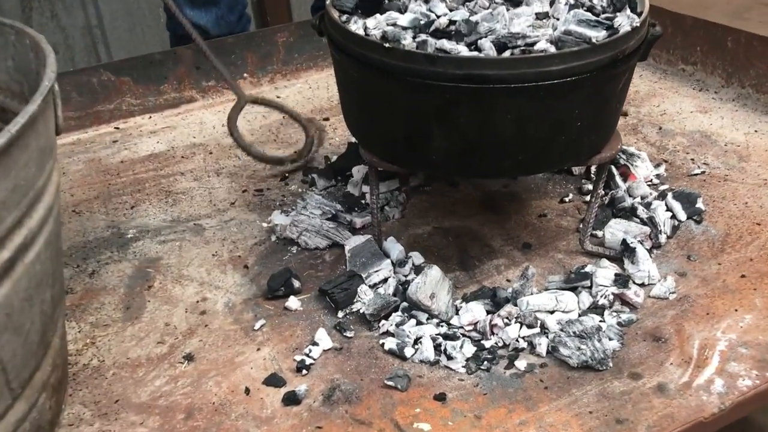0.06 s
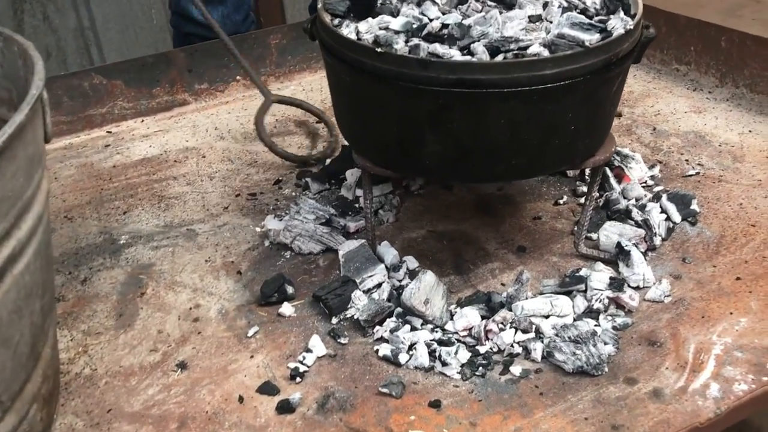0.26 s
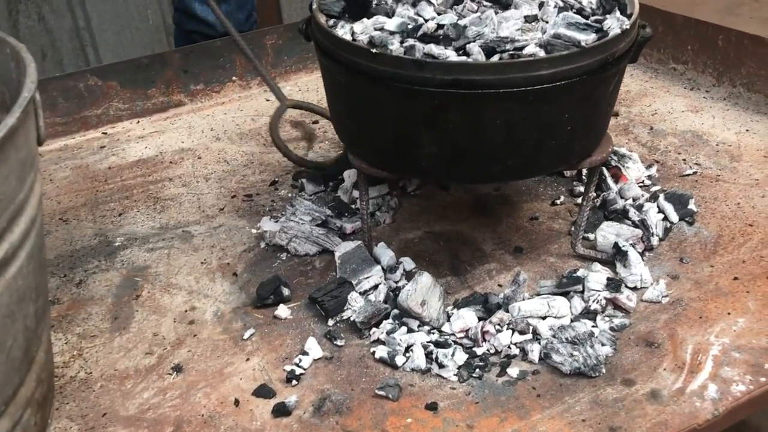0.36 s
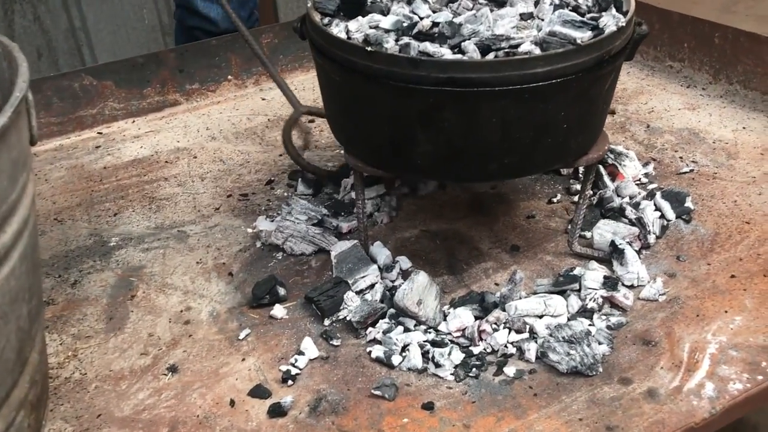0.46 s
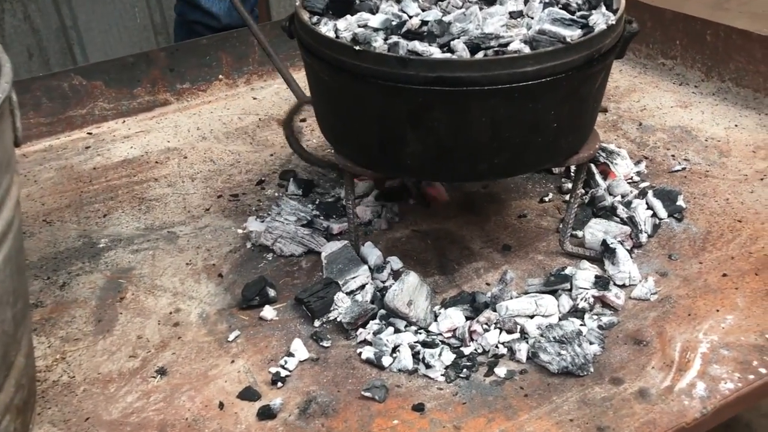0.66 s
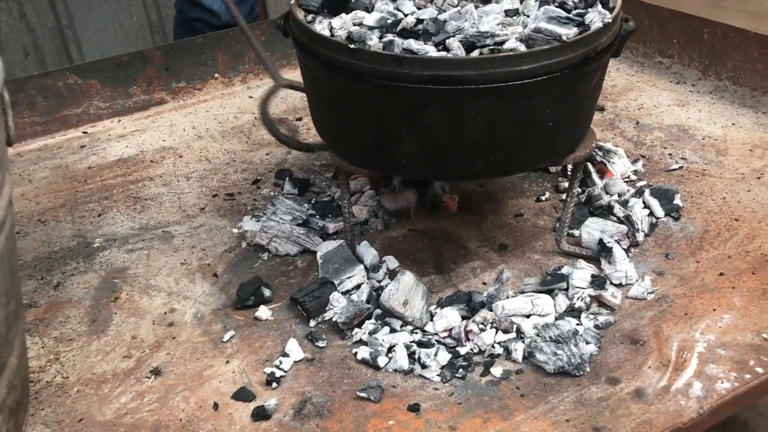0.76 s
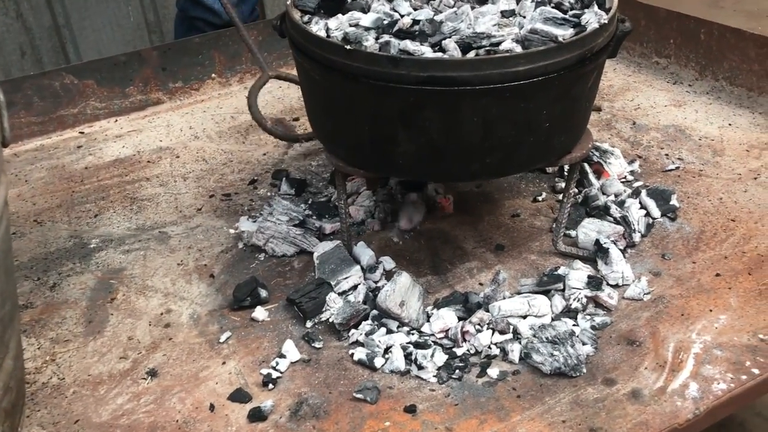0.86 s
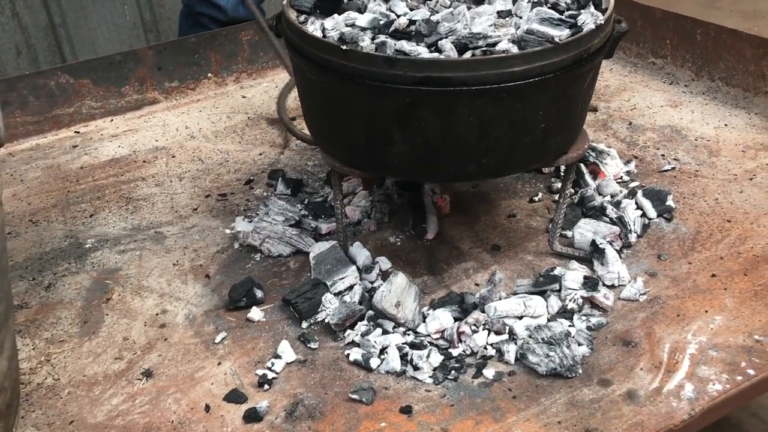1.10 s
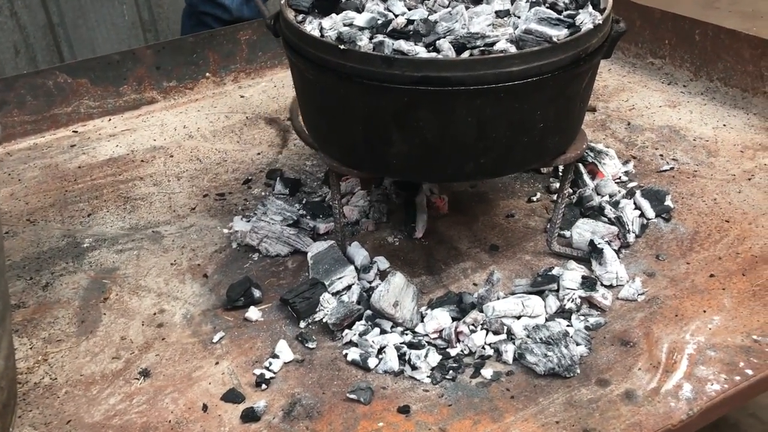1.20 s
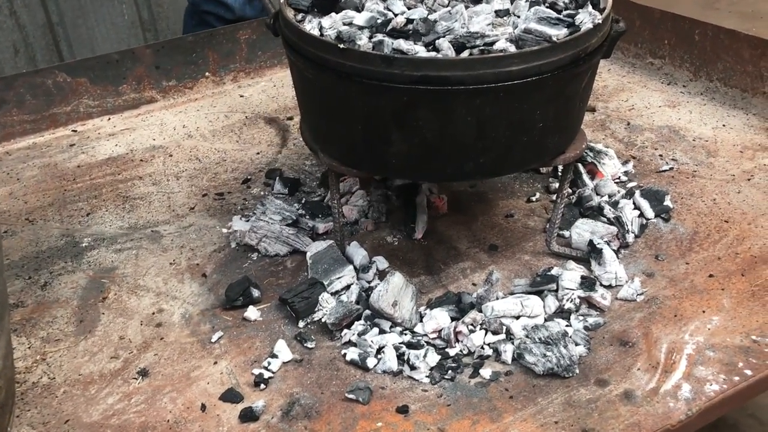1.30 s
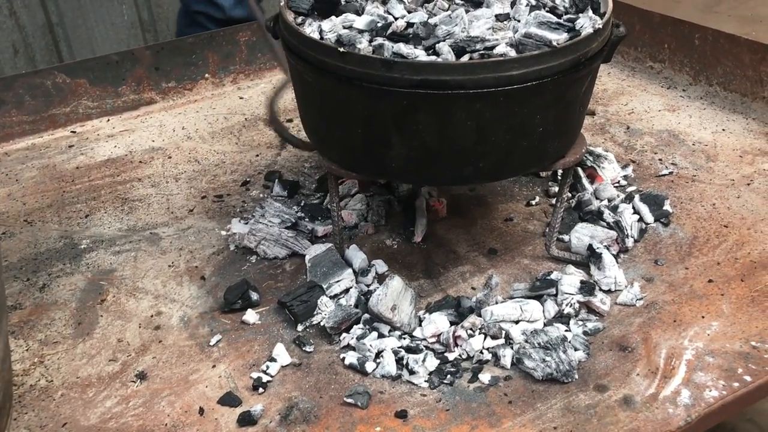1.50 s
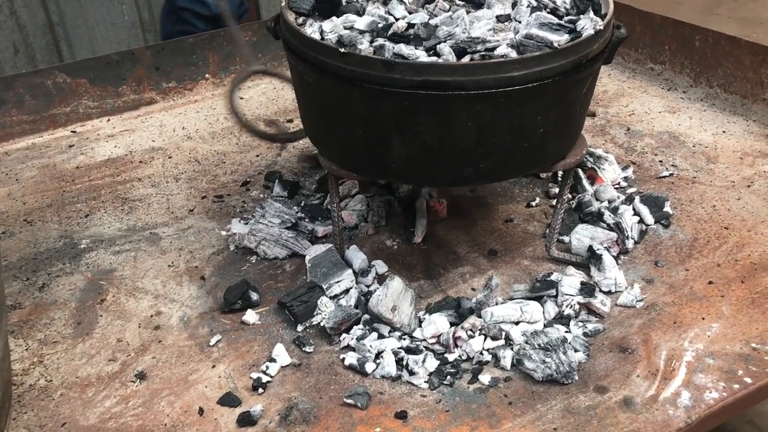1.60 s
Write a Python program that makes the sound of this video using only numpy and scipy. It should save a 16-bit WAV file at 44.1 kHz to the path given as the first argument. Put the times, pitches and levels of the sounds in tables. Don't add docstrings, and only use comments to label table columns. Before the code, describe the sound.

A metal poker shoves hard coals across a sheet-metal table: a sharp clanky knock and rattling scrape, a brief lull, then duller low thuds under an iron pot, close stereo microphones in a reverberant barn.

```python
import sys
import numpy as np
from scipy import signal
from scipy.fft import rfft, irfft
from scipy.io import wavfile
from scipy.ndimage import uniform_filter1d

SR = 44100
rng = np.random.default_rng(int(sys.argv[2]) if len(sys.argv) > 2 else 0)


def ratio_of_db(decibels):
    return 10 ** (np.asarray(decibels, float) / 20)


def put_to_file(sound):
    columns = np.atleast_2d(sound).T
    safe = np.clip(columns, -1, 1)
    whole_steps = np.round(safe * 32767)
    wavfile.write(sys.argv[1], SR, whole_steps.astype(np.int16))


N = 72765
LEAD = SR // 4
LONG = N + LEAD
RISE = 0.31

# (start [s], length [s], force [dB], contact hardness [Hz], grit [dB])
RIM_CONTACTS = [(-.12, 0.12, -51.5, 1630, -56.5), (-.02, 0.061, -50.5, 2950, -57.5),
                (0.2298, 0.00334, -26.5, 2390, -38.5), (0.243, 0.02, -27.5, 2220, -81),
                (0.352, 0.037, -44, 900, -42), (0.373, 0.059, -26.5, 2420, -45),
                (0.449, 0.02, -29.5, 2560, -39.5), (0.478, 0.044, -30, 3660, -42.5),
                (0.547, 0.097, -47, 2460, -56), (0.708, 0.034, -50, 870, -61),
                (0.763, 0.0058, -37, 634, -48.5), (0.8576, 0.0053, -39, 1250, -48),
                (0.876, 0.033, -45.5, 990, -61), (0.918, 0.03, -47, 1260, -66)]
# (start [s], length [s], force [dB], contact hardness [Hz], grit [dB])
MIDDLE_CONTACTS = [(1.069, 0.011, -32, 402, -47.5), (1.078, 0.027, -31.5, 730, -57.5),
                   (1.098, 0.011, -49, 350, -72), (1.121, 0.0064, -29, 415, -71),
                   (1.142, 0.0084, -32.5, 454, -51), (1.18, 0.041, -36, 1180, -52),
                   (1.225, 0.029, -45.5, 3380, -46.5), (1.247, 0.077, -33, 870, -45),
                   (1.324, 0.019, -41.5, 2030, -47), (1.365, 0.073, -43, 1210, -60.5),
                   (1.43, 0.036, -58.5, 4000, -64), (1.487, 0.032, -45.5, 820, -75),
                   (1.572, 0.036, -49.5, 790, -64)]


def read(points, hz):
    f, value = np.transpose(points)
    return np.interp(np.log(hz + 1), np.log(f + 1), value)


def evened(x):
    return x / np.sqrt(np.mean(x ** 2) + 1e-20)


def colour(x, points):
    count = x.shape[-1]
    gain = ratio_of_db(read(points, np.fft.rfftfreq(count, 1 / SR)))
    return irfft(rfft(x) * gain, count)


def two_sides(a, b, same):
    same = np.clip(same, 0, 1)
    return np.array([a, same * a + np.sqrt(1 - same ** 2) * b])


def pair(count):
    # (frequency [Hz], left-right likeness [0 to 1])
    likeness = [(100, 0.97), (700, 1), (1500, 0.74), (3000, 0.36), (6000, 0.061), (14000, 0.074)]
    a, b = rfft(rng.standard_normal((2, count)))
    same = read(likeness, np.fft.rfftfreq(count, 1 / SR))
    return irfft(two_sides(a, b, same), count)


def dying(t60s, rise_s, count=SR):
    hz, t, z = signal.stft(pair(count), SR, nperseg=256)
    fade = ratio_of_db(-60 * t / read(t60s, hz)[:, None])
    tail = signal.istft(z * fade, SR, nperseg=256)[1][:, :count]
    tail = tail * np.minimum(np.arange(count) / SR / rise_s, 1)
    return tail / np.linalg.norm(tail[0])


def through(x, response):
    return signal.fftconvolve(np.atleast_2d(x), np.atleast_2d(response), axes=1)[:, :LONG]


def clicks(per_s, spread_db):
    size = ratio_of_db(spread_db * np.minimum(rng.exponential(1, LONG), 4))
    size = size * rng.choice([-1, 1], LONG)
    return evened(size * (rng.random(LONG) < per_s / SR))


def pressure(start, length, release_s):
    t = (np.arange(LONG) - LEAD) / SR - start
    rise = np.clip(t / (RISE * length), 0, 1)
    return rise * np.exp(-np.maximum(t - length, 0) / release_s)


def still_air():
    # (frequency [Hz], level per Hz [dB])
    air_colour = [(20, -20), (55, 7), (90, 2), (150, 3), (400, -4), (1200, -15.5), (4000, -29),
                  (11000, -31), (15800, -46)]
    return ratio_of_db(-48) * evened(colour(pair(LONG), air_colour))


def table(contacts, spot):
    # (pitch [Hz], t60 [s], level struck at rim [dB], level struck in middle [dB])
    plate_modes = [(138.2, 0.36, -13.5, -10), (206.5, 0.3, -12, -7.5), (248.3, 0.19, -8.5, -8.5),
                   (343, 0.19, -14.5, -12), (386.4, 0.55, -10.5, -16), (471.5, 0.46, -15, -11),
                   (625, 0.14, -17.5, -15), (778, 0.34, -12, -15.5), (790.3, 0.077, -14.5, -4),
                   (841, 0.24, -9, -3), (904, 0.14, -18, -6), (1050, 0.32, -17, -44),
                   (1530, 0.12, -24, -33), (2136, 0.2, -31, -32)]
    # (frequency [Hz], level [dB])
    rumble_colour = [(40, -53), (110, -2.5), (300, 0.5), (900, -1.5), (1200, -1.5), (2200, 0), (3200, -8.5),
                     (8000, -15)]
    # (frequency [Hz], t60 [s])
    rumble_t60 = [(100, 0.9), (800, 0.43), (3000, 0.29)]
    out = np.zeros((2, LONG + SR))
    bumps = clicks(per_s=500, spread_db=5)
    t = np.arange(SR // 2) / SR
    modes = 0
    for mode in plate_modes:
        modes = modes + ratio_of_db(mode[2 + spot] - 60 * t / mode[1]) * np.sin(2 * np.pi * mode[0] * t) / 18
    for start, length, force_db, hard_hz, _ in contacts:
        at = LEAD + round(start * SR)
        push = (bumps * pressure(start, length, release_s=0.007))[at:at + SR // 5]
        push[0] += 12
        pole = np.exp(-2 * np.pi * hard_hz / SR)
        force = ratio_of_db(force_db) * signal.lfilter([(1 - pole) ** 2], [1, -2 * pole, pole ** 2], push)
        rumble = colour(dying(rumble_t60, 0.00073, count=SR // 2), rumble_colour) * (t < .4)
        ring = through(force, modes + ratio_of_db(14) * rumble)
        out[:, at:at + ring.shape[1]] += ring
    bass_cut = signal.butter(3, 99, "high", fs=SR, output="sos")
    return signal.sosfilt(bass_cut, out[:, :LONG])


def grit():
    # (frequency [Hz], level per Hz [dB])
    grit_colour = [(1470, -8), (2500, -3.5), (3270, -5.5), (4000, -4), (4780, -4.5), (6060, -4),
                   (9930, 1.5), (15800, -13.5)]
    level = 0
    for start, length, _, _, grit_db in RIM_CONTACTS + MIDDLE_CONTACTS:
        level = level + ratio_of_db(grit_db) * pressure(start, length + 0.0081, release_s=0.0059)
    a = clicks(per_s=5000, spread_db=5.5)
    b = clicks(per_s=5000, spread_db=5.5)
    grains = colour(two_sides(a, b, same=0.4), [(900, -31)] + list(grit_colour))
    return level * evened(grains)


def embers():
    # (time [s], level [dB], centre [Hz], width [Hz])
    ticks = [(.1002, -46.5, 12400, 4000), (0.2319, -31.5, 5800, 6900), (0.362, -40.5, 13700, 4000),
             (.378, -35, 14000, 3000), (.39, -43, 9000, 6000), (.6534, -40, 10700, 7000),
             (.742, -51, 8750, 4000), (.763, -37, 10400, 3040), (.7635, -47, 6150, 2500),
             (.797, -42, 8900, 4000), (0.862, -37.5, 10800, 2170), (.862, -50, 3500, 2000),
             (.871, -44, 10600, 1960), (.884, -62, 6200, 3000), (1.074, -56, 8600, 4030),
             (1.193, -38, 8240, 1200), (1.42, -54, 2800, 900), (1.454, -48, 2800, 1200),
             (1.42, -46, 2800, 900), (1.454, -40.5, 2800, 1200), (1.456, -33.5, 8100, 4970),
             (1.457, -43, 15200, 700), (1.505, -42, 15600, 696), (1.607, -52, 7060, 2860),
             (1.616, -48, 12300, 5000)]
    out = np.zeros(LONG)
    t = np.arange(1024) / SR
    for start, level_db, centre_hz, width_hz in ticks:
        noise = rng.standard_normal(1024)
        band = np.exp(-((np.fft.rfftfreq(1024, 1 / SR) - centre_hz) / width_hz) ** 2)
        snap = evened(irfft(rfft(noise) * band)) * np.exp(-t / 0.0031)
        at = LEAD + round(start * SR)
        out[at:at + 1024] += ratio_of_db(level_db) * snap
    return out


def chatter():
    # (start [s], length [s], level [dB],
    # pitch [Hz], t60 [s])
    locked_tones = [(.2312, 0.0042, -21.5, 141, 0.39), (.2312, 0.0052, -19.5, 200, 0.19),
                    (.2315, 0.016, -24.5, 795, 0.3), (.2315, 0.0043, -29.5, 610, .1),
                    (.24, 0.0096, -38, 1630, 0.089), (.249, .005, -25.5, 249, 0.075),
                    (.262, 0.02, -35, 930, .2), (.29, 0.024, -29.5, 480, .12), (.285, .02, -33, 310, .15),
                    (.34, 0.077, -31, 257, 0.28), (.345, 0.057, -33, 930, 0.19),
                    (.375, 0.045, -28.5, 141.2, 0.23), (.3807, 0.043, -26, 213, .15),
                    (.388, 0.0046, -24.5, 845, 0.045), (.404, 0.017, -18.5, 835, 0.091),
                    (.427, .01, -20.5, 895, 0.07), (.39, 0.026, -38, 960, 0.15),
                    (.385, 0.028, -32.5, 440, 0.11), (.385, 0.043, -48, 550, .2),
                    (.42, 0.028, -26, 760, 0.17), (.422, 0.01, -23, 256, .15),
                    (.42, 0.078, -31.5, 613, 0.13), (.462, 0.008, -20, 820, 0.094),
                    (.46, .05, -36, 1400, 0.18), (.46, .065, -37, 2115, 0.09),
                    (.49, 0.037, -31.5, 710, 0.23), (.495, 0.048, -33.5, 852, 0.12),
                    (.49, 0.029, -35, 236, 0.095), (.5, 0.059, -35.5, 1040, 0.13),
                    (.57, 0.034, -35, 760, .25), (.575, 0.017, -33, 144, 0.42),
                    (.75, 0.012, -53, 123.7, 0.26), (.859, 0.0089, -39, 570, 0.22),
                    (1, 0.015, -37, 335, .15), (.87, 0.023, -43.5, 780, 0.18), (0.62, .02, -52, 1000, 0.22),
                    (.859, 0.012, -47, 880, .2), (.97, .0063, -43, 345, 0.044),
                    (1.0723, 0.0021, -21.5, 360, 0.057), (1.078, 0.0018, -24, 218, 0.19),
                      (1.078, 0.027, -25, 133, 0.3), (1.085, 0.014, -40.5, 780, .15),
                      (1.095, 0.059, -44, 868, 0.12), (1.092, .015, -41.5, 966, 0.11),
                      (1.12, 0.0099, -30, 281, 0.074), (1.142, 0.0048, -32, 140, 0.091),
                      (1.169, 0.027, -46, 890, 0.12), (1.225, 0.053, -50, 1724, .07),
                      (1.226, 0.025, -37.5, 355.6, 0.14), (1.248, 0.024, -25.5, 133.1, 0.89),
                      (1.249, 0.043, -42.5, 583, 0.12), (1.304, 0.0099, -27, 352.5, 0.078),
                      (1.29, 0.043, -42.5, 841, 0.1), (1.326, .03, -40.5, 756, 0.074),
                      (1.344, 0.033, -40, 890, 0.1), (1.334, 0.013, -44, 2090, .08),
                      (1.425, 0.024, -48, 2274, 0.073), (1.456, 0.01, -53.5, 3670, 0.055)]
    out = np.zeros(LONG + SR)
    t = np.arange(SR // 2) / SR
    for start, length, level_db, hz, t60 in locked_tones:
        span = round(13 * SR / (hz + 150))
        wander = uniform_filter1d(rng.standard_normal((2, len(t))), span)
        wander = uniform_filter1d(wander, span)
        waver = 0.3 * np.sqrt(hz / 600) * evened(wander)
        rise = np.clip(t / (RISE * length), 0, 1)
        ring_out = ratio_of_db(level_db - 60 * np.maximum(t - length, 0) / t60)
        swell = rise * ring_out * np.cos(np.pi * t) ** .5
        turn = 2 * np.pi * hz * t
        tone = (1.114 + waver[0]) * np.sin(turn) + waver[1] * np.cos(turn)
        at = LEAD + round(start * SR)
        out[at:at + len(t)] += swell * tone
    return out[:LONG]


def barn(send):
    # (frequency [Hz], t60 [s])
    barn_t60 = [(100, 1), (500, 0.79), (2000, 0.76), (6000, 0.39), (14000, 0.27)]
    turn = np.arange(LONG) / SR * 2 * np.pi * 5.5
    wash = 0
    for k in range(3):
        share = np.sqrt(2 / 3) * np.cos(turn + k * np.pi / 3)
        wash = wash + through(send * share, dying(barn_t60, rise_s=0.0063))
    return wash


def scene():
    plate = table(RIM_CONTACTS, spot=0) + table(MIDDLE_CONTACTS, spot=1) + chatter()
    fine = grit()
    snaps = embers()
    send = ratio_of_db(-10.5) * plate[0] + ratio_of_db(3.5) * fine[0] + ratio_of_db(-8) * snaps
    return (plate + fine + snaps + barn(send) + still_air())[:, LEAD:]


def roll_off(x):
    return signal.sosfilt(signal.butter(12, 15600, fs=SR, output="sos"), x)


def record(dry):
    # (frequency [Hz], left over right [dB])
    left_gain = [(100, 1.5), (1000, 3.5), (3000, 2), (7000, 1.5), (14000, -1.5)]
    left_lag_s = 6e-5
    hz = np.fft.rfftfreq(N, 1 / SR)
    left = ratio_of_db(read(left_gain, hz) / 2) * np.exp(-1j * np.pi * hz * left_lag_s)
    sides = np.array([left, 1 / left])
    mix = irfft(rfft(dry) * sides * (hz < 15840), N)
    return roll_off(mix)


dry = scene()
out = record(dry)
put_to_file(out)
```